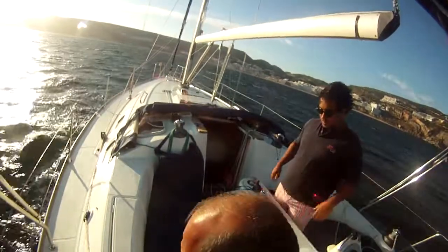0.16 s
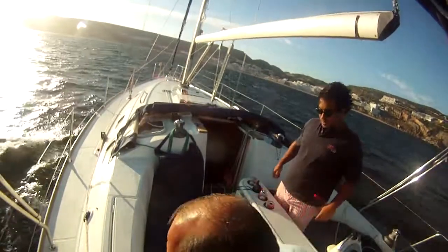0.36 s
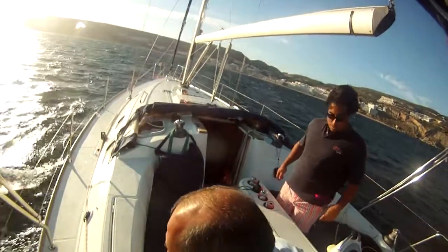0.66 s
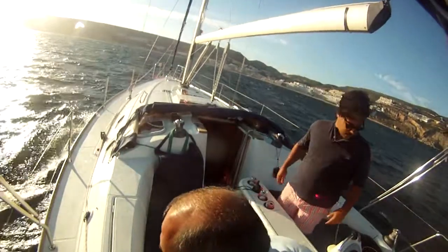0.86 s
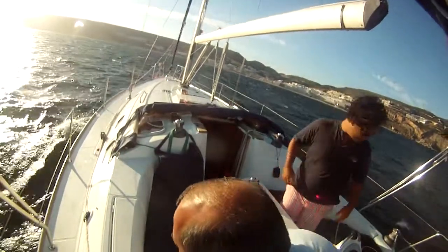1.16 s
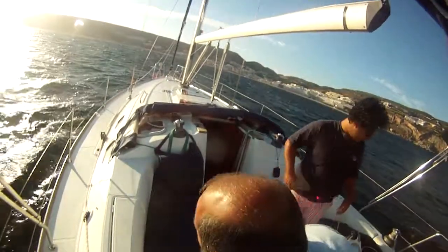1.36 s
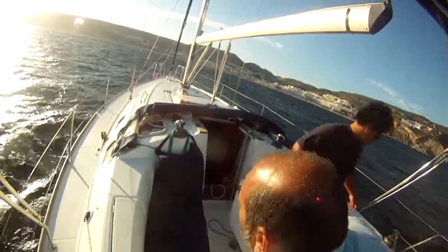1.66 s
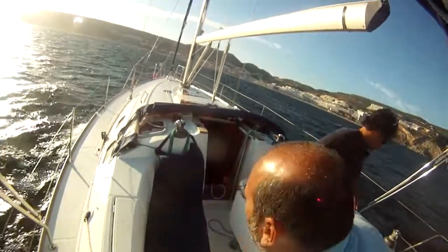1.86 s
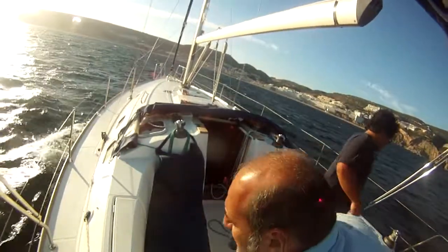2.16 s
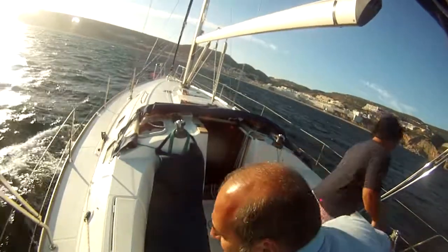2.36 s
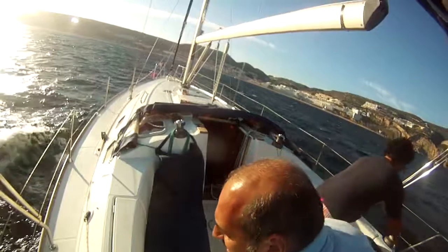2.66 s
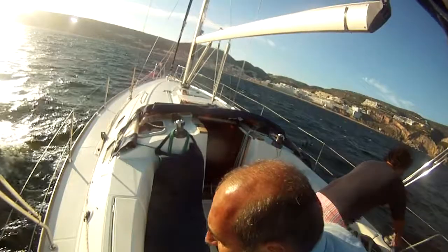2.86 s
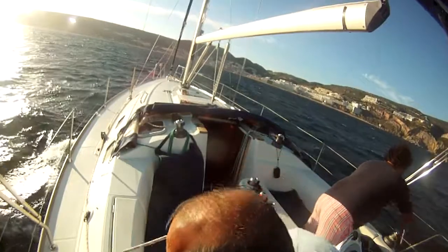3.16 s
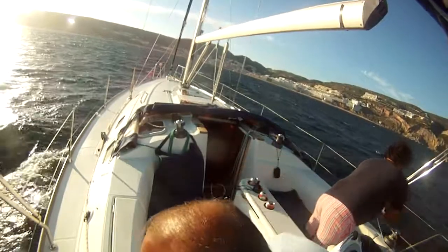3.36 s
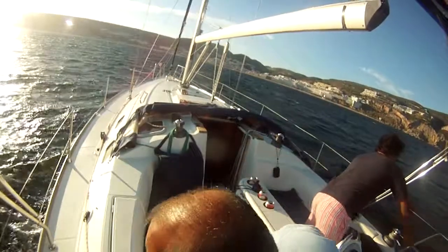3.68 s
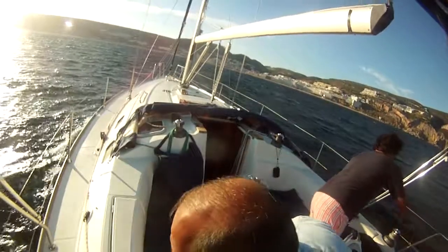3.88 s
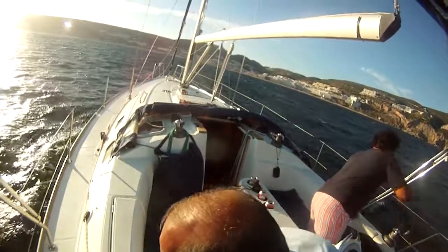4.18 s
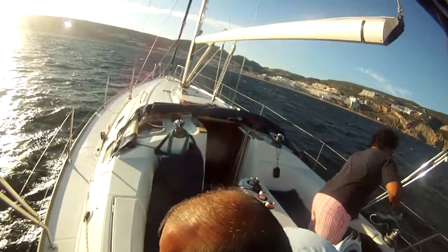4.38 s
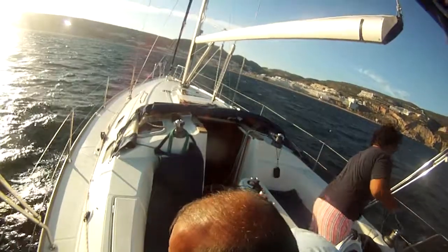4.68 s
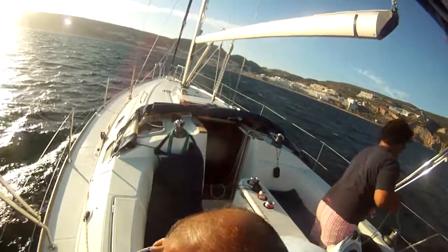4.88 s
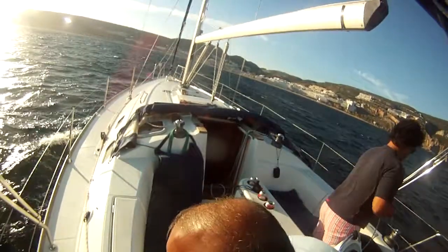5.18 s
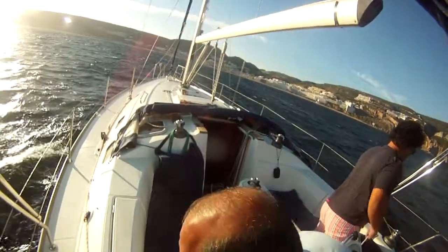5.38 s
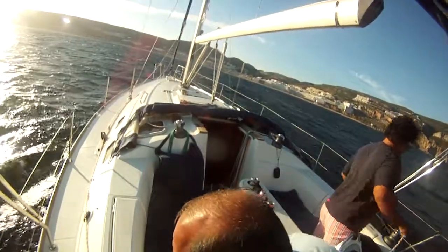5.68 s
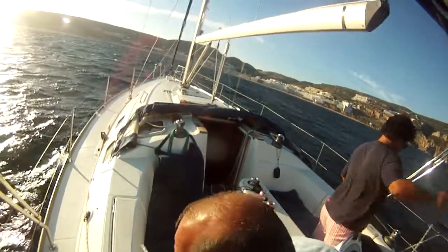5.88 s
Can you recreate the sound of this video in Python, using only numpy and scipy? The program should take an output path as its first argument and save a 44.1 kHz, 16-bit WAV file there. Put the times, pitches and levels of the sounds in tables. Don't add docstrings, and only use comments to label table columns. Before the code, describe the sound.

A steady low engine rumble dominates, throbbing several times a second as the propeller hum swells and fades. Soft hull booms come irregularly, with thin, boxy water wash behind. A brief creaking rope groan comes first, then later a bright triple-contact metal snap, the loudest sharp event. Loose gear ticks faintly. Open sea, heard close on deck through a muffling case, with fast level control and coarse, low-quality treble.

```python
import sys
import numpy as np
from scipy import signal
from scipy.fft import rfft, irfft, next_fast_len
from scipy.io import wavfile
from scipy.ndimage import uniform_filter1d, map_coordinates

SR = 44100
rng = np.random.default_rng(int(sys.argv[2]) if len(sys.argv) > 2 else 0)


def transcribe(signal):
    frames = np.atleast_2d(signal).T
    limited = np.clip(frames, -1, 1)
    pcm = np.round(limited * 32767).astype(np.int16)
    wavfile.write(sys.argv[1], SR, pcm)


def natural_amplitude(level_db):
    exponent = np.asarray(level_db, float) / 20
    return 10 ** exponent


N = 265923

# (time [s], blade tone level [dB])
PROPELLER_BITE = [(0, -28), (.17, -35), (.32, -36), (.62, -23), (.8, -24), (1.15, -44), (1.36, -78),
                  (1.7, -40), (2.2, -22), (2.45, -25.5), (2.7, -22.5), (3.03, -27.5), (3.22, -38),
                  (3.75, -26), (4.08, -20), (4.65, -30), (5.3, -23.5), (6.03, -37.5)]
# (pitch [Hz], width [Hz], level [dB])
UPPER_PANELS = [(173, 10.6, -5), (190.9, 8.05, 0), (209.4, 11.8, -9), (243.3, 11, -18.5)]
# (pitch [Hz], width [Hz], level [dB])
LOWER_PANEL = [(146.2, 10.5, 0)]
# (pitch [Hz], width [Hz], level [dB])
KEEL_BOOM = [(40, 15.5, 6.5), (64.3, 10.8, 4.5), (84, 7, -4), (138, 18, -14)]
# (time [s], peak level [dB], length [s])
WAVE_THUDS = [(0.087, -22.5, 0.11), (0.264, -21.5, 0.18), (0.647, -14, 0.05), (0.777, -23, 0.12),
              (1.152, -19.5, 0.13), (1.445, -21.5, 0.086), (1.558, -18.5, 0.053), (1.73, -21, 0.18),
              (1.997, -23, 0.14), (2.178, -15.5, 0.072), (2.318, -17, 0.15), (2.477, -20.5, 0.12),
              (2.68, -17, 0.044), (2.8, -22, 0.074), (3.296, -19.5, 0.1), (3.492, -26, 0.068),
              (3.586, -18.5, 0.14), (3.914, -17, 0.034), (4.215, -23.5, 0.16), (4.487, -24, 0.12),
              (4.635, -15, 0.057), (4.795, -20.5, 0.056), (5.156, -29.5, .1), (5.315, -20, 0.12),
              (5.55, -15, 0.056), (5.758, -18, 0.095), (5.929, -23.5, 0.041)]
# (time [s], peak level [dB], length [s])
WAVE_FLEXES = [(.33, -26, 0.063), (0.515, -22.5, 0.27), (1.295, -27.5, 0.092), (2.08, -27.5, 0.093),
               (2.47, -24, 0.12), (2.57, -25, .08), (3.055, -24, 0.075), (3.417, -31.5, 0.32),
               (3.993, -26.5, 0.11), (4.277, -28.5, 0.07), (4.626, -42, 0.19), (4.88, -27.5, 0.11),
               (5.195, -25, 0.18), (5.55, -27, 0.049), (5.806, -24.5, 0.073), (6.0, -24, .12)]
# (time [s], wash level [dB])
HULL_FLOW = [(0, -38.5), (1.4, -40), (1.85, -33.5), (2.08, -38), (2.3, -36.5), (2.8, -40), (3.6, -36),
             (4.5, -40), (5, -40), (6.03, -34)]
# (time [s], wash peak level [dB], spray over wash [dB], length [s])
BREAKING_CRESTS = [(0.193, -36.5, -7, 0.14), (0.34, -45, 0.5, 0.13), (0.665, -38, -4, 0.14),
                   (1.27, -45.5, -7, 0.1), (2.016, -36, -21.5, 0.19), (2.21, -31.5, -18, 0.072),
                   (2.42, -34, -13, 0.12), (2.694, -32.5, -11.5, 0.18), (2.88, -37, -9.5, 0.17),
                   (3.21, -39, -11, 0.17), (3.51, -31, -14.5, 0.042), (3.607, -39, -7.5, .14),
                   (3.746, -45, -6, 0.13), (4.125, -38.5, -6.5, 0.053), (4.412, -44, -4, 0.36),
                   (4.68, -35, -5.5, 0.14), (4.808, -38.5, -0.5, 0.093), (4.962, -35.5, -5.5, 0.12),
                   (5.22, -38.5, -2, 0.19), (5.435, -42, -2, .08), (5.549, -36, -3.5, 0.071),
                   (5.737, -36, -9.5, 0.17)]
# (pitch [Hz], level [dB])
CASE_WALL = [(150, -3), (260, -3.5), (400, -12), (850, -13), (1200, -10.5), (1700, -11.5), (2600, -7),
             (2900, -20), (3200, -16), (4200, -23), (5300, -28.5), (5950, -38.5), (6050, -38)]
# (pitch [Hz], width [Hz], lift over the wall's slope [dB])
CASE_RINGING = [(330, 13, 10.5), (537.3, 58, 15.5), (700, 25, 10.5), (992.4, 30, 19.5), (2103, 55, 14.5),
                (2687, 41, 7), (3690, 120, 8.5), (5280, 200, 2.5)]
# (time [s], groan level [dB], squeal over groan [dB], length [s])
SHEET_HAULS = [
    (1.695, -36, -16, .05),
    (1.765, -31, -16, .06),
    (1.865, -31.5, -21, .08),
    (1.95, -38, -15, .045),
]
# (pitch [Hz], width [Hz], level [dB])
WINCH_DRUM = [(980, 70, -3), (2025, 55, 2), (2085, 60, 0), (2200, 90, -5), (3670, 140, -11),
              (4080, 300, -14)]
# (time [s], peak level [dB], thump level [dB], brightness [dB])
PAWL_KNOCKS = [
    (3.4576, -7.5, -14, -1),
    (3.4678, -6, -7, -8),
    (3.477, -15, -2, -16),
]
# (pitch [Hz], level [dB], time to fade 60 dB [s])
PAWL_RINGING = [(1300, -14, .03), (1771, -10, .035), (2175, 0, .04), (2428, -8, .03), (2611, -12, .03),
                (3100, -12, .022), (3400, -9, .022), (3688, -2, .024), (4050, -7, .022), (4420, -16, .018),
                (5308, -18, .018)]
# (time [s], peak level [dB], pitch [Hz])
GEAR_TAPS = [(1.655, -27, 947), (1.692, -24.5, 980), (2.025, -22, 995), (2.203, -26.5, 2090),
             (2.243, -24.5, 2100), (3.111, -26.5, 1002), (3.353, -27.5, 1990), (3.354, -33, 3960),
             (3.355, -34, 3340), (3.36, -35, 1500), (3.364, -26.5, 500), (3.366, -28.5, 1030),
             (3.382, -32, 2680), (3.391, -30.5, 2030), (3.498, -39, 2620), (3.522, -29, 2160),
             (3.525, -20, 1000), (3.718, -27, 2080), (3.758, -28, 2160), (4.703, -37, 1010),
             (4.779, -35.5, 3700), (4.795, -26, 994), (4.853, -23, 2330), (4.866, -25, 2060),
             (5.16, -27, 964), (5.201, -25.5, 1115), (5.203, -27, 593), (5.76, -23.5, 1004),
             (5.785, -22, 990)]


def unit(x):
    return x / np.sqrt(np.mean(x ** 2) + 1e-20)


def even(x, seconds):
    power = np.abs(uniform_filter1d(x ** 2, int(seconds * SR)))
    return unit(x / np.sqrt(power + 1e-12))


def curve(rows):
    s, values = np.transpose(rows)
    return np.interp(np.arange(N) / SR, s, values)


def swells(s, peak_db, length_s, rest_db):
    t = np.arange(0, N + 64, 64) / SR
    bells = natural_amplitude(2 * np.asarray(peak_db)) * np.exp(-(2 * (t[:, None] - s) / length_s) ** 2)
    swell_power = np.interp(np.arange(N) / SR, t, bells.sum(axis=1))
    return 10 * np.log10(natural_amplitude(2 * rest_db) + swell_power)


def wobble(rate):
    knots = rng.standard_normal(int(N * rate / SR) + 4)
    return map_coordinates(knots, [np.arange(N) * rate / SR])


def filtered(x, response):
    m = 2 * next_fast_len(N // 2 + SR // 4)
    return irfft(rfft(x, m) * response(np.fft.rfftfreq(m, 1 / SR)), m)[:N]


def modes(table):
    def response(f):
        total = 0
        for k, (hz, width, db) in enumerate(table):
            total = total + (-1) ** k * natural_amplitude(db) * 1j * f * width / (hz * hz - f * f + 1j * f * width)
        return total
    return response


def tone(cycles, drift):
    return np.sqrt(2) * np.cos(2 * np.pi * (cycles + drift))


def thud_level():
    return swells(*np.transpose(WAVE_THUDS), rest_db=-27.5)


def engine():
    crank_hz, first_firing_s = 38.25, .0122
    free_db, hum_dip_db, full_bite_db = -15, 4, -17.5
    thud_dip_db, hard_thud_db = 2.5, -14.5
    bite = natural_amplitude(curve(PROPELLER_BITE) - full_bite_db)
    thuds = uniform_filter1d(natural_amplitude(thud_level() - hard_thud_db), SR // 10)
    fire_db = free_db - hum_dip_db * bite - thud_dip_db * thuds
    turns = crank_hz * (np.arange(N) / SR - first_firing_s)
    firing = natural_amplitude(fire_db + .4 * wobble(9)) * tone(3 * turns / 2, .012 * wobble(6))
    crank = natural_amplitude(-38.0 + 5.0 * wobble(4.2)) * tone(turns, 0.039 * wobble(7.5))
    return firing + crank


def propeller():
    blade_hz, first_pass_s = 48.91, .0143
    passes = blade_hz * (np.arange(N) / SR - first_pass_s)
    return natural_amplitude(curve(PROPELLER_BITE) + .6) * tone(passes, .035 * wobble(3))


def shaken(table, top_hz):
    def response(f):
        return modes(table)(f) / (1 + (f / top_hz) ** 4) / (1 + (30 / (f + 1)) ** 4)
    return filtered(rng.standard_normal(N), response)


def hull():
    flex_db = swells(*np.transpose(WAVE_FLEXES), rest_db=-33)
    upper = natural_amplitude(thud_level() - 0.98) * even(shaken(UPPER_PANELS, top_hz=294), 0.086)
    lower_ring = filtered(shaken(LOWER_PANEL, top_hz=202), modes(LOWER_PANEL))
    lower = natural_amplitude(flex_db - 1.0) * even(lower_ring, 0.13)
    keel = natural_amplitude(-26) * unit(shaken(KEEL_BOOM, top_hz=150))
    return upper + lower + keel


def case(f):
    hz, db = np.transpose(CASE_WALL)
    power = 1
    for pitch, width, lift_db in CASE_RINGING:
        power = power + natural_amplitude(2 * lift_db) / (1 + (2 * (f - pitch) / width) ** 2)
    wall_db = np.interp(np.log(f + 1), np.log(hz), db, left=-120, right=-120)
    return natural_amplitude(wall_db) * np.sqrt(power)


def wash():
    flow_db = curve(HULL_FLOW)
    s, crest_db, over_db, length_s = np.transpose(BREAKING_CRESTS)
    wash_db = swells(s, crest_db, length_s, flow_db)
    spray_db = swells(s, crest_db + over_db, length_s, flow_db - 7.5)

    spectrum = signal.stft(rng.standard_normal(N), nperseg=512)[2]
    patches = uniform_filter1d(rng.standard_normal(spectrum.shape), 8, 0)
    patches = uniform_filter1d(patches, 8, 1)
    hiss = signal.istft(spectrum * natural_amplitude(1.27 * unit(patches)), nperseg=512)[1][:N]

    drops_per_s = 400
    size_db = np.minimum(13.5 * rng.exponential(size=N), 14)
    drops = (rng.random(N) < drops_per_s / SR) * natural_amplitude(size_db) * rng.standard_normal(N)

    flutter = natural_amplitude(0.29 * wobble(24) + 1.24 * wobble(40))
    water = filtered((unit(hiss) + 0.4 * unit(drops)) * flutter, case)
    low = filtered(water, lambda f: 1 / (1 + (f / 1350) ** 8))
    spray = water - low
    return natural_amplitude(wash_db + 1.0) * even(low, 0.14) + natural_amplitude(spray_db + 2.0) * even(spray, 0.12)


def sheet():
    haul_start_s, haul_end_s = 1.63, 1.985
    t = np.arange(N) / SR
    touching = (t > haul_start_s) & (t < haul_end_s)
    slips = rng.standard_normal(N) * natural_amplitude(2.3 * wobble(90))
    s, pull_db, over_db, length_s = np.transpose(SHEET_HAULS)
    groan_db = swells(s, pull_db, length_s, rest_db=-48)
    squeal_db = swells(s, pull_db + over_db, length_s, rest_db=-58)

    groan = filtered(slips, lambda f: modes(WINCH_DRUM)(f) ** 2)
    squeal = even(filtered(slips, lambda f: modes([(5278, 80, 0)])(f) ** 2), .06)
    pulses = .3 + np.cos(np.pi * (52 * t + .3 * wobble(25))) ** 2
    scrape = unit(filtered(slips, modes([(4500, 2000, -1)])))
    squeal = unit(squeal * pulses) + .8 * scrape
    return touching * (natural_amplitude(groan_db + 1.5) * even(groan, .03) + natural_amplitude(squeal_db + 3.5) * squeal)


def snaps():
    out, cracks = np.zeros(N + SR), np.zeros(N + SR)
    t = np.arange(SR // 8) / SR
    onset = (1 - np.exp(-t / .003)) ** 1.5
    damping = np.exp(-(t / .011) ** 4)
    for s, db, thump_db, bright_db in PAWL_KNOCKS:
        ring = 0
        for hz, level, t60 in PAWL_RINGING:
            level_db = level + bright_db * (hz > 3000) + rng.normal(0, 0.67)
            ring = ring + natural_amplitude(level_db - 60 * t / t60) * np.sin(2 * np.pi * (hz * t + rng.random()))
        thump = natural_amplitude(thump_db - 60 * t / .045) * np.sin(2 * np.pi * 1000 * t)
        start = round(s * SR)
        out[start:][:len(t)] += natural_amplitude(db + 5) * (ring + thump) * onset * damping
        cracks[start:][:len(t)] += natural_amplitude(db - 60 * t / .035) * rng.standard_normal(len(t))
    crack_body = modes([(1050, 500, 0), (3330, 2000, -2.5), (5230, 900, -7.5)])
    return out[:N] + natural_amplitude(-7) * filtered(cracks[:N], crack_body)


def taps():
    out, t = np.zeros(N + SR), np.arange(SR // 8) / SR
    for s, db, hz in GEAR_TAPS:
        t60 = 0.057 * (1000 / hz) ** 0.52
        pair = np.sin(2 * np.pi * hz * t)
        pair = pair + .5 * np.sin(2 * np.pi * (1.07 * hz * t + rng.random()))
        tap = natural_amplitude(db + 4 - 60 * t / t60) * pair * (1 - np.exp(-t / 0.0036))
        out[round(s * SR):][:len(t)] += tap
    return out[:N]


def scene():
    return (engine() + propeller() + hull() + wash() + sheet() + snaps() + taps())[None]


def band_limit(x):
    return signal.sosfilt(signal.butter(12, 15640, fs=SR, output="sos"), x)


def record(dry):
    power = dry[0] ** 2
    keep = np.exp(-1 / (0.019 * SR))
    fast = signal.lfilter([1 - keep], [1, -keep], power, zi=[power.mean() * keep])[0]
    slow = np.abs(uniform_filter1d(power, SR // 4))
    levelled = dry[0] * ((slow + 1e-9) / (fast + 1e-9)) ** .19
    coarse = signal.resample(levelled, N * 12000 // SR)
    held = signal.resample(np.repeat(coarse, 4), N)
    held = filtered(held, lambda f: f < 15290)
    return band_limit(held[None])


dry = scene()
out = record(dry)
transcribe(out)
```